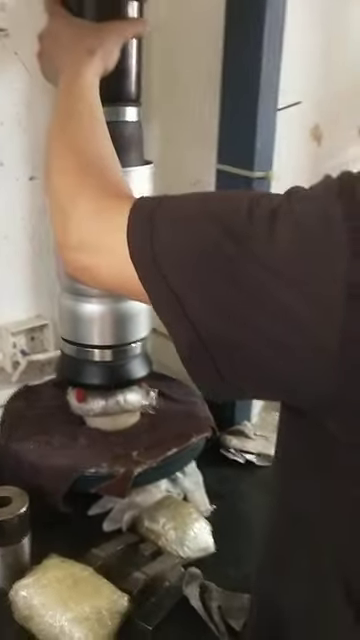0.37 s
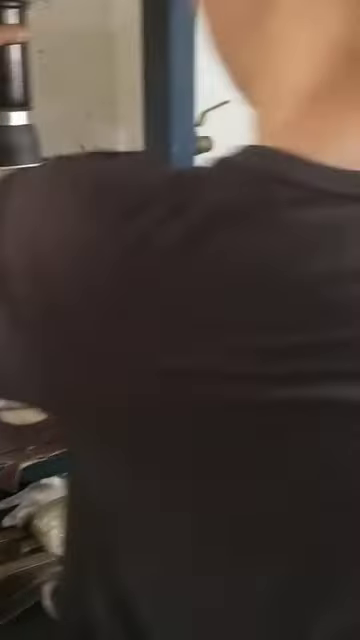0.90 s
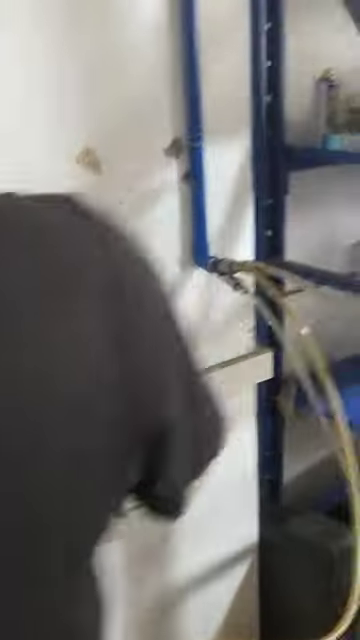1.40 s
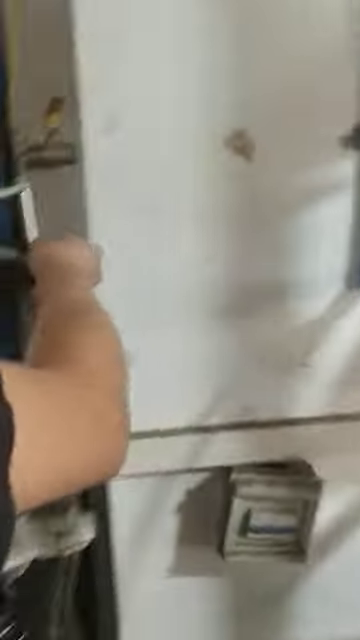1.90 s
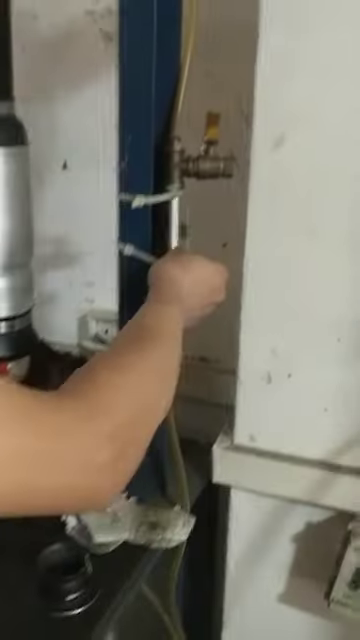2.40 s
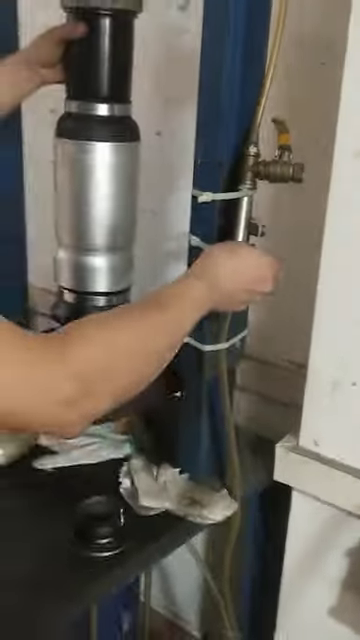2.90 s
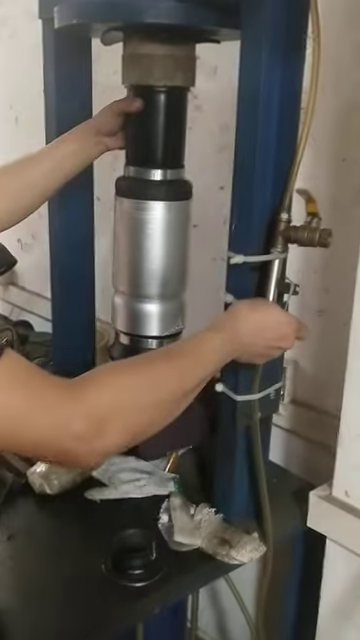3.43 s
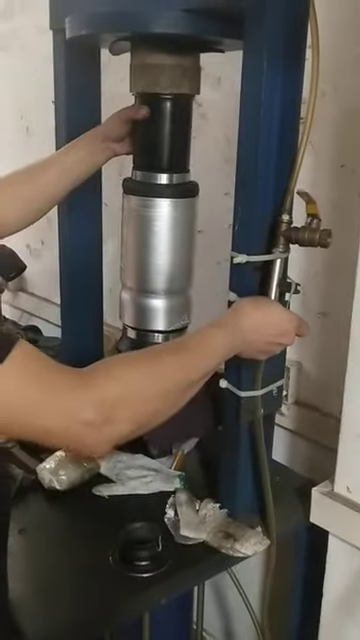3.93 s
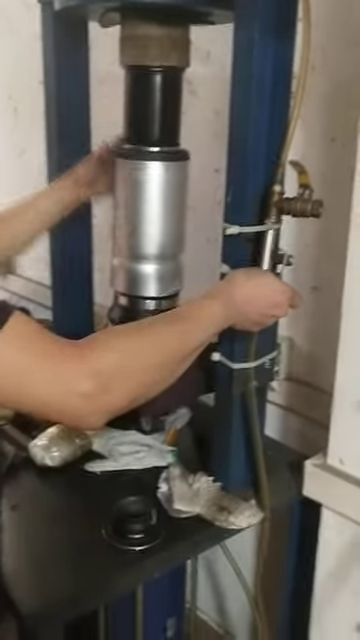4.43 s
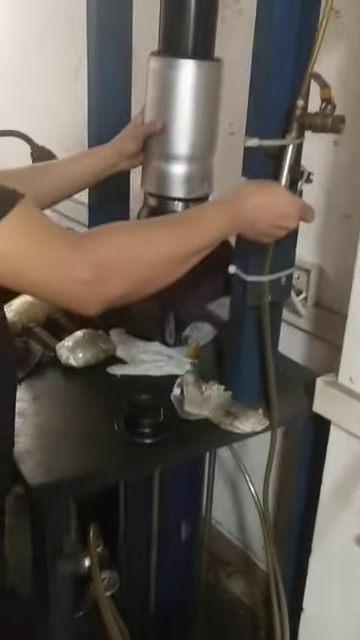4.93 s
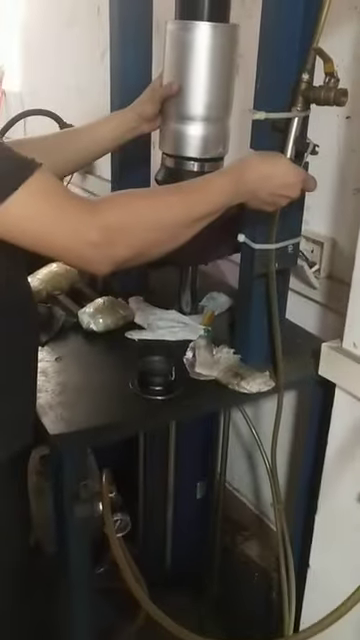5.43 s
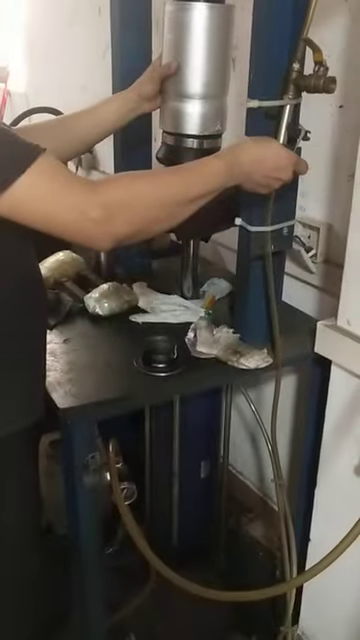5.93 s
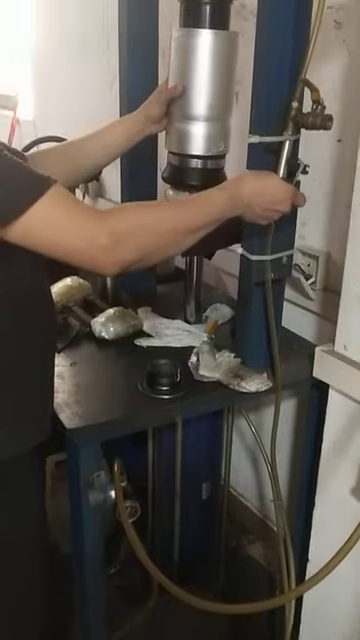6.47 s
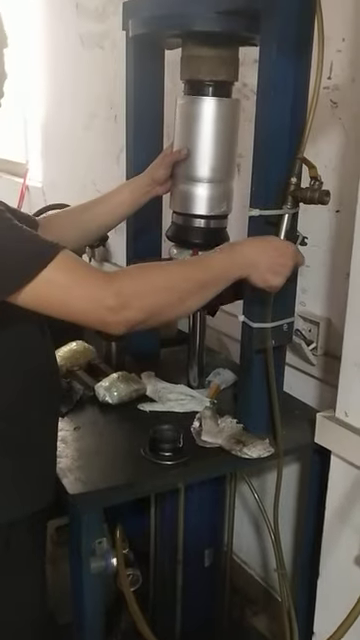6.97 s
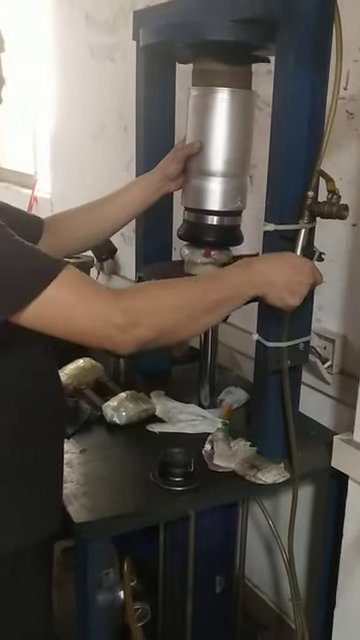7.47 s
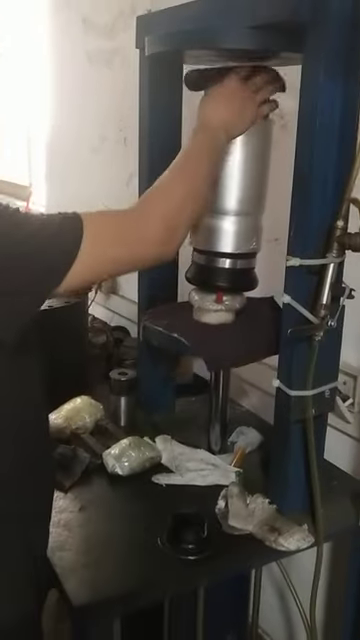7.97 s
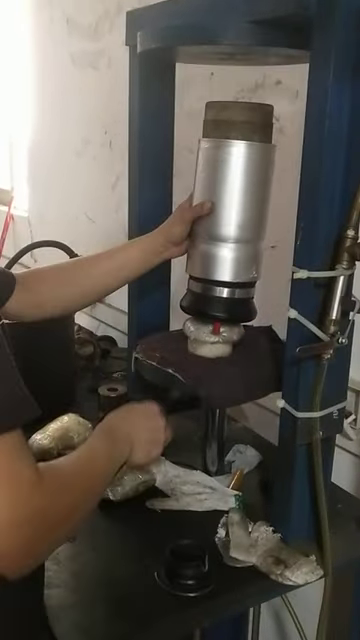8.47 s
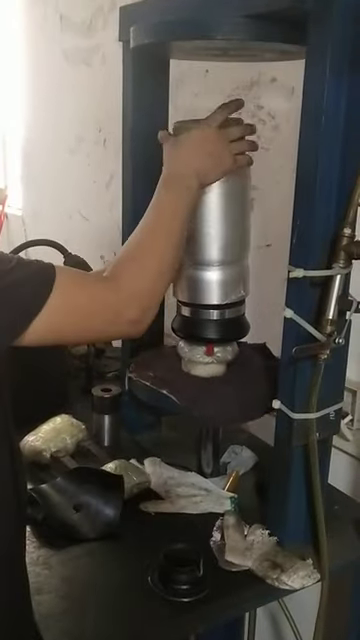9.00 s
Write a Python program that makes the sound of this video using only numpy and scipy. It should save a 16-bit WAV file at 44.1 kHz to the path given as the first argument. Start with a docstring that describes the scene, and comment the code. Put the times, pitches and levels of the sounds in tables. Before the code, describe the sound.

Close to a moving hand-held microphone in a workshop, compressed air rushes from a valve in a dense, bright hiss. It dips and dulls briefly near the start as a body passes, then continues with gentle shifts in colour. At about seven seconds the valve shuts and the jet dies quickly. A thinner, slightly whistling leak swells in, with a distant low machine drone becoming noticeable.

```python
"""Workshop, at a press: a hand valve blows compressed air close to a moving hand-held microphone.
The jet is shaped noise in four layers, dulled by passing bodies and combed by a nearby reflection.
The valve shuts after seven seconds; a steady leak, noise partly ringing in the pipework, and the
drone of far machines are then heard, their recorded level rising after the jet stops. Breathy bands
and faint whistles are wandering tones; one nudge of the microphone is a decaying low sine."""
import sys
import numpy as np
from scipy import signal
from scipy.fft import rfft, irfft, next_fast_len
from scipy.io import wavfile
from scipy.ndimage import uniform_filter1d, map_coordinates

SR = 44100
rng = np.random.default_rng(int(sys.argv[2]) if len(sys.argv) > 2 else 0)


def waveform_to_disk(signal):
    """Save audio, clipped to [-1, 1], as 16-bit WAV at the path in sys.argv[1]."""
    frames = np.transpose(np.atleast_2d(signal))
    scaled = np.clip(frames, -1, 1) * 32767
    samples = np.round(scaled).astype(np.int16)
    wavfile.write(sys.argv[1], SR, samples)


def field_ratio(decibels):
    """Amplitude ratio for a level in dB (20 dB per decade); scalars and array-likes work."""
    return 10 ** (np.asarray(decibels, dtype=float) / 20)


N = 401742  # length in samples

# Jet layers as bodies pass and the microphone moves, before the valve's gain: (time [s], level [dB])
CORE_LEVEL = [(0, -31.5), (.09, -26), (.2, -24), (.36, -26.5), (.5, -32.5), (.63, -29.5), (.88, -23),
              (1.0, -26.5), (1.18, -27.5), (1.33, -26.5), (1.42, -24.5), (1.6, -27), (1.8, -24.5),
              (2.2, -26), (2.52, -24), (2.9, -27), (3.25, -26.5), (3.55, -26), (4.25, -24.5), (4.55, -26.5),
              (5.3, -28.5), (5.8, -27.5), (6.95, -28)]
ROAR_LEVEL = [(0, -41), (.2, -39.5), (.45, -44), (.82, -37), (1.03, -41), (1.35, -38), (1.9, -38.5),
              (2.5, -42), (3.6, -42), (5.2, -46), (6.2, -43.5), (6.9, -42.5)]
JET_TREBLE_LEVEL = [(0, -40), (.09, -32), (.36, -32), (.5, -34.5), (.65, -33.5), (.88, -32.5),
                    (1.15, -35.5), (1.7, -33), (2.6, -33.5), (3.3, -35), (4.35, -33.5), (5.3, -36),
                    (6.6, -35), (6.95, -32)]
# Spectra of the jet's layers, from low to high: (frequency [Hz], relative density [dB])
ROAR_SPECTRUM = [(150, -19.5), (250, -14.5), (455, -9.5), (700, -5), (865, -2), (1060, -6), (1380, -3.5),
                 (1590, -3.5), (1900, -3), (2200, -4.5), (2660, -4), (4510, -120)]
BODY_SPECTRUM = [(1350, -40), (2120, -21), (2320, -8), (2510, -8), (3150, -4.5), (3360, -3), (3550, -1.5),
                 (4690, -1.5), (5000, -2), (6500, -13), (11000, -120)]
CORE_SPECTRUM = [(2820, -29), (4800, -4.5), (5690, 1.5), (6970, 3.5), (8710, -7), (10500, -22.5),
                 (13600, -32), (22000, -120)]
JET_TREBLE_SPECTRUM = [(5880, -34), (10000, -4), (12800, -5), (14000, -4), (14900, 0), (15400, -2)]
# Nearest reflection of the jet: (time [s], delay [ms], strength [0-1])
REFLECTION = [(0, 0.66, .14), (1, 0.56, 0.13), (1.4, 0.34, .14), (2.2, 0.62, 0), (3.6, 0.82, 0.27),
              (4.5, 0.78, 0.22), (5, 0.87, .08), (6.6, 0.77, 0)]
# A body dulls the jet's treble: (time [s], share of the full shading [0-1])
BODY_SHADE = [(.36, 0), (.46, 1), (.62, 1), (.82, 0), (.98, 0), (1.08, 0.4), (1.3, 0.2), (1.5, 0)]
# The valve closes: (time [s], gain on the jet [dB])
VALVE_GAIN = [(6.96, 1.5), (7.12, -2.5), (7.22, -16), (7.4, -45)]

# Recorded level of the leak's hiss, low part and treble, before the hold-down during the jet:
# (time [s], level [dB])
LEAK_LEVEL = [(7.2, -35.5), (7.35, -32.5), (7.5, -33.5), (7.65, -28.5), (7.95, -26), (8.12, -27.5),
              (9.1, -27.5)]
LEAK_LOW_LEVEL = [(7.2, -44.5), (7.35, -41.5), (7.45, -47), (7.55, -44), (7.7, -43), (7.8, -36),
                  (7.95, -32), (8.15, -36.5), (9.1, -36.5)]
LEAK_TREBLE_LEVEL = [(7.22, -42), (7.35, -38.5), (7.7, -39), (7.95, -31.5), (8.15, -36.5), (9.1, -36.5)]
# Spectra of the leak's freely escaping air: (frequency [Hz], relative density [dB])
LEAK_LOW_SPECTRUM = [(290, -56), (500, -12.5), (1080, 0), (1210, -7.5), (1650, -4.5), (1930, -1),
                     (2310, -5), (2950, -0.5), (4000, -6), (5200, -44), (8800, -120)]
LEAK_AIR_SPECTRUM = [(1760, -34), (3100, -18), (3350, -5), (3720, -9), (4610, 2), (5280, -21), (5870, 1),
                     (6280, -17), (6730, 3), (7870, 5), (9020, -6), (10500, -21), (13600, -22),
                     (22000, -120)]
LEAK_TREBLE_SPECTRUM = [(5880, -29), (10000, 1), (10500, -4), (11700, -4), (12600, -7), (14000, -5),
                        (14900, -1), (15400, 1)]
# Resonances of the pipework: (centre [Hz], width [Hz], relative peak [dB])
PIPE_MODES = [(1080, 200, -12), (1925, 80, -12), (3040, 60, -13), (3430, 60, -13), (4200, 60, -13),
              (4610, 190, -11), (4930, 70, -7), (5310, 190, -6.5), (5910, 70, -12), (6360, 45, 0),
              (6525, 50, -4), (6885, 130, -2), (7295, 60, -6), (7710, 70, -3), (8410, 55, -10),
              (8880, 50, -15), (9510, 60, -18), (10000, 60, -17)]

# Breathy bands that stand out of the hiss: (start [s], length [s], from [Hz], to [Hz], level [dB])
BREATHY_BANDS = [(0.499, 0.96, 1626, 1923, -43), (.7, .35, 5230, 4900, -41), (2.651, .48, 5540, 5480, -35),
                 (2.75, 0.4, 4280, 4190, -39), (2.8, 2.3, 2550, 2433, -49), (4.598, 1.7, 6230, 6430, -43),
                 (6.6, .5, 2540, 2640, -43), (5.892, 0.53, 3970, 4100, -40), (6.102, 1.1, 5220, 5180, -39)]
# Faint whistles around a fixed pitch: (start [s], length [s], pitch [Hz], level [dB])
FAINT_WHISTLES = [(0, .9, 1596, -51), (7.493, .1, 505, -47), (7.51, .07, 3980, -42),
                  (7.53, 0.38, 2210, -52), (7.56, .13, 3430, -37.5), (7.643, .13, 3800, -49),
                  (7.755, 0.12, 511, -45.5), (7.845, 0.26, 1068, -45), (9.03, .08, 920, -46)]
# Nudge of the microphone: (time [s], pitch [Hz], starting amplitude [dB], 60 dB decay time [s])
NUDGE = (2.704, 140, -33, .045)

# Recorded level of the whole shop background: (time [s], gain [dB])
SHOP_LEVEL = [(0, -53.5), (.4, -54), (1.3, -50), (2.1, -52), (3.9, -54), (5.1, -56), (7.0, -50.5),
              (7.5, -47.5), (7.9, -42), (9.1, -42.5)]
# Spectrum of the far drone: (frequency [Hz], relative density [dB])
DRONE_SPECTRUM = [(15, -53), (25, -13), (98, 1.5), (162, -2), (254, -2), (294, -1.5), (382, -2.5),
                  (482, -2.5), (755, -2), (800, -5), (1040, -10), (1400, -21), (2400, -120)]
# Machine hum, each filter pass: (centre [Hz], width [Hz], relative peak [dB])
HUM_MODES = [(104, 16, 0), (295, 22, -1)]


def unit(x):
    """Scale to rms 1."""
    return x / np.sqrt(np.mean(x ** 2) + 1e-20)


def curves(rows):
    """One value per sample for each column after the time."""
    s, *cols = np.transpose(rows)
    return [np.interp(np.arange(N) / SR, s, c) for c in cols]


def wobble(rate, size=N):
    """A smooth random curve with rate knots a second."""
    knots = rng.standard_normal(int(size * rate / SR) + 4)
    return map_coordinates(knots, [np.arange(size) * rate / SR])


def filtered(x, response):
    """Multiply the spectrum of x by a response of frequency in Hz."""
    m = next_fast_len(N + 8192)
    return irfft(rfft(x, m) * response(np.fft.rfftfreq(m, 1 / SR)), m)[..., :N]


def colour(spectrum):
    """Gain through (Hz, dB) points joined along a log frequency axis."""
    f, db = np.transpose(spectrum)
    return lambda hz: field_ratio(np.interp(np.log(hz + 1), np.log(f + 1), db))


def resonances(modes):
    """Gain of resonant peaks whose powers add."""
    def gain(hz):
        power = sum(field_ratio(2 * db) / (1 + (2 * (hz - centre) / width) ** 2) for centre, width, db in modes)
        return np.sqrt(power)
    return gain


def streaked(x, window, bins, frames, depth_db):
    """Vary x by a random gain, smooth over some bins and frames of its short-time spectrum."""
    z = signal.stft(x, nperseg=window)[2]
    field = uniform_filter1d(rng.standard_normal(z.shape), size=bins, axis=0)
    field = uniform_filter1d(field, size=frames, axis=1)
    return signal.istft(z * field_ratio(depth_db * unit(field)), nperseg=window)[1][:N]


def rush(gain, fine_db, ripple_db, patchy_db):
    """Noise of rms 1: far and near walls ripple it in slow streaks, turbulence in short wide patches."""
    x = streaked(rng.standard_normal(N), 4096, 3, 12, fine_db)
    x = streaked(x, 1024, 4, 40, ripple_db)
    x = streaked(x, 1024, 20, 5, patchy_db)
    return unit(filtered(x, gain))


def jet():
    """Turbulent air in four layers with a moving, dull reflection; the core outlasts the others."""
    (core_db,), (roar_db,), (treble_db,) = curves(CORE_LEVEL), curves(ROAR_LEVEL), curves(JET_TREBLE_LEVEL)
    (valve_db,), (shade,) = curves(VALVE_GAIN), curves(BODY_SHADE)
    delay_ms, strength = curves(REFLECTION)
    body_db = -31.5 + 0.75 * (core_db + 25)  # follows three quarters of the core's swings about -25 dB

    # the other layers take an extra share of the closing, so they die away sooner
    core = field_ratio(core_db) * rush(colour(CORE_SPECTRUM), fine_db=2.0, ripple_db=1.5, patchy_db=0.7)
    roar = rush(colour(ROAR_SPECTRUM), fine_db=2.0, ripple_db=0.8, patchy_db=0.67)
    roar = field_ratio(roar_db + 0.15 * valve_db) * roar
    body = rush(colour(BODY_SPECTRUM), fine_db=2.0, ripple_db=1.25, patchy_db=0.63)
    body = field_ratio(body_db + 0.2 * valve_db) * body
    treble = rush(colour(JET_TREBLE_SPECTRUM), fine_db=0.8, ripple_db=1.4, patchy_db=1.3)
    treble = field_ratio(treble_db + 0.4 * valve_db) * treble

    # full shading removes 0.63 of the amplitude well above 11.6 kHz
    shaded_part = filtered(treble, lambda hz: 0.63 / (1 + (11600 / (hz + 1)) ** 16))
    treble = treble - shade * shaded_part

    air = core + roar + body
    dull = filtered(air, lambda hz: 1 / (1 + (hz / 6500) ** 4))
    reflection = strength * map_coordinates(dull, [np.arange(N) - delay_ms * SR / 1000], order=3)
    flutter_db = 0.26 * wobble(12) + 0.18 * wobble(5.05)
    return field_ratio(valve_db + flutter_db) * (air + reflection + treble)


def leak():
    """A thin hiss, partly free and partly ringing in the pipes, held low during the jet."""
    (level_db,), (low_db,) = curves(LEAK_LEVEL), curves(LEAK_LOW_LEVEL)
    (treble_db,) = curves(LEAK_TREBLE_LEVEL)
    pipes = resonances(PIPE_MODES)

    def high(hz):
        return np.clip((hz - 3000) / 400, 0, 1)  # splits the ringing at 3.0-3.4 kHz

    free = rush(colour(LEAK_AIR_SPECTRUM), fine_db=2, ripple_db=1.8, patchy_db=0.6)
    rung = rush(lambda hz: pipes(hz) * high(hz), fine_db=1.5, ripple_db=2, patchy_db=0.5)
    low_free = rush(colour(LEAK_LOW_SPECTRUM), fine_db=1.5, ripple_db=1.3, patchy_db=0.6)
    low_rung = rush(lambda hz: pipes(hz) * (1 - high(hz)), fine_db=0.5, ripple_db=0.8, patchy_db=0.5)
    treble = rush(colour(LEAK_TREBLE_SPECTRUM), fine_db=1.3, ripple_db=1.5, patchy_db=0.6)

    hiss = field_ratio(level_db) * (field_ratio(-4.5) * free + field_ratio(-0.3) * rung)
    hiss = hiss + field_ratio(low_db) * (low_free + field_ratio(-12.5) * low_rung)
    hiss = hiss + field_ratio(treble_db) * treble
    held_db = np.interp(np.arange(N) / SR, (6.9, 7.17), [-12, 0])
    return field_ratio(held_db + 0.65 * wobble(11)) * hiss


def wandering_tone(length_s, from_hz, to_hz, width_hz, edge_s):
    """A soft-ended gliding tone; the wider it is, the faster its size and phase wander."""
    u = np.linspace(0, 1, round(length_s * SR))
    swell = np.clip(length_s / edge_s * np.minimum(u, 1 - u), 0, 1)
    steady = 8 / width_hz  # a narrow tone keeps a larger steady part
    wander = steady + wobble(width_hz, size=len(u)) + 1j * wobble(width_hz, size=len(u))
    tone = np.exp(2j * np.pi * np.cumsum(from_hz + (to_hz - from_hz) * u) / SR)
    return swell * unit((wander * tone).real)


def whistles():
    """Wide wandering tones make the breathy bands, narrow ones the faint whistles."""
    out = np.zeros(N + SR)
    for start_s, length_s, from_hz, to_hz, db in BREATHY_BANDS:
        tone = wandering_tone(length_s, from_hz, to_hz, width_hz=260, edge_s=length_s / 5)
        out[round(start_s * SR):][:len(tone)] += field_ratio(db) * tone
    for start_s, length_s, hz, db in FAINT_WHISTLES:
        tone = wandering_tone(length_s, hz, hz, width_hz=0.014 * hz, edge_s=0.012)
        out[round(start_s * SR):][:len(tone)] += field_ratio(db) * tone
    return out[:N]


def bump():
    """One dull low knock on the microphone's casing: a sine that decays exponentially."""
    start_s, hz, db, t60_s = NUDGE
    t = np.clip(np.arange(N) / SR - start_s, 0, None)
    return field_ratio(db - 60 * t / t60_s) * np.sin(2 * np.pi * hz * t)


def shop():
    """The low drone of far machines as shaped noise, with an unsteady hum of narrow noise bands."""
    (level_db,) = curves(SHOP_LEVEL)
    drone = rush(colour(DRONE_SPECTRUM), fine_db=2.0, ripple_db=1.35, patchy_db=0.0)
    peaks = resonances(HUM_MODES)
    hum = unit(filtered(rng.standard_normal(N), lambda hz: peaks(hz) ** 2))  # two passes: steep skirts
    return field_ratio(level_db) * (field_ratio(0.3) * drone + field_ratio(-9.0) * hum)


def scene():
    """One microphone feeds both channels."""
    mono = jet() + leak() + whistles() + bump() + shop()
    return np.array([mono, mono])


def low_pass(x):
    """Removes everything above the highest recorded frequency."""
    return signal.sosfilt(signal.butter(12, 16850, fs=SR, output="sos"), x)


def record(dry):
    """The microphone loses the deepest bass, and nothing passes from the 15.55 kHz band limit up."""
    def microphone(hz):
        return (hz < 15550) * hz ** 2 / (hz ** 2 + 42 ** 2)  # half amplitude at 42 Hz

    mix = filtered(dry, microphone)
    return low_pass(mix)


dry = scene()
out = record(dry)
waveform_to_disk(out)
```